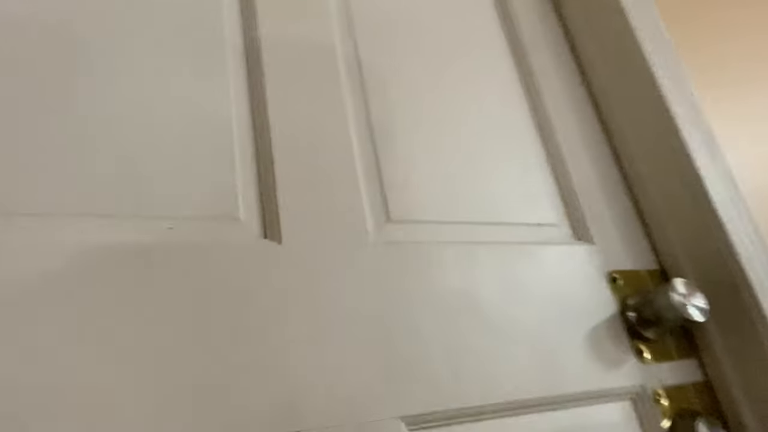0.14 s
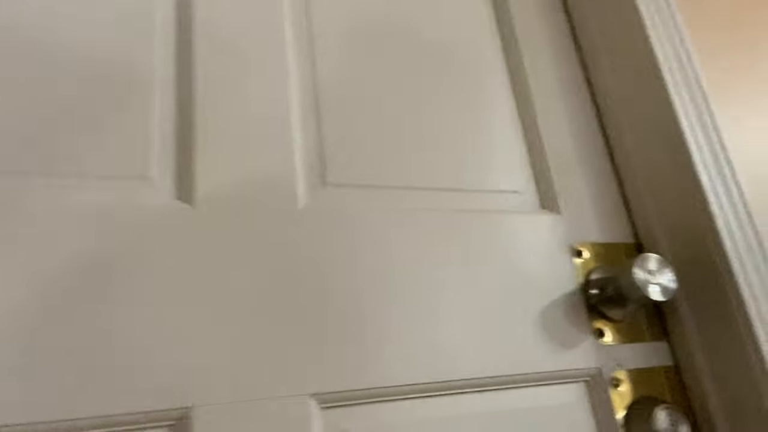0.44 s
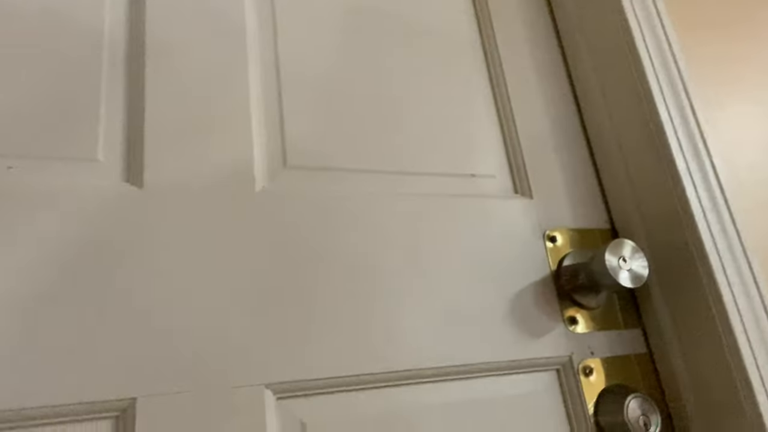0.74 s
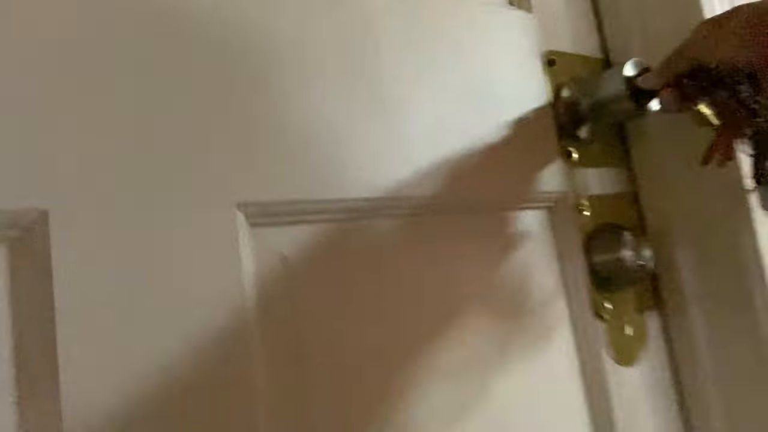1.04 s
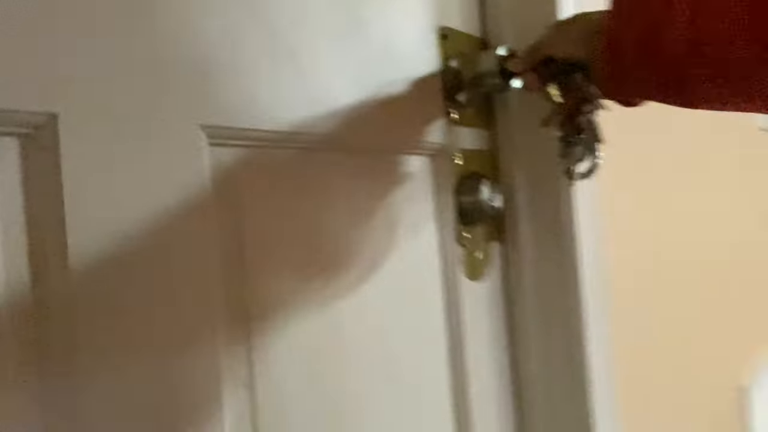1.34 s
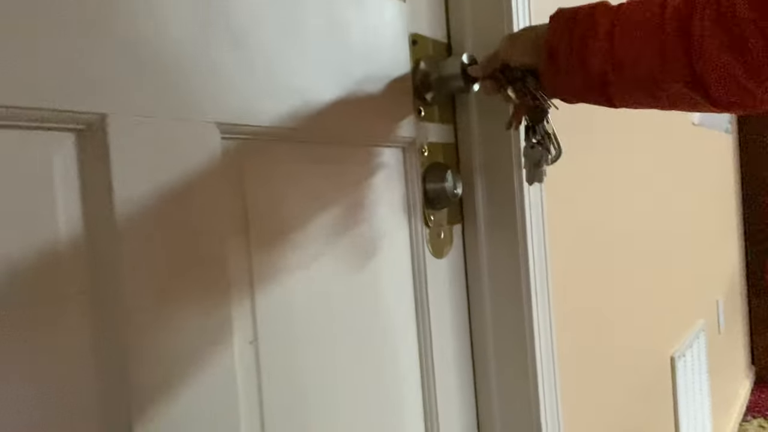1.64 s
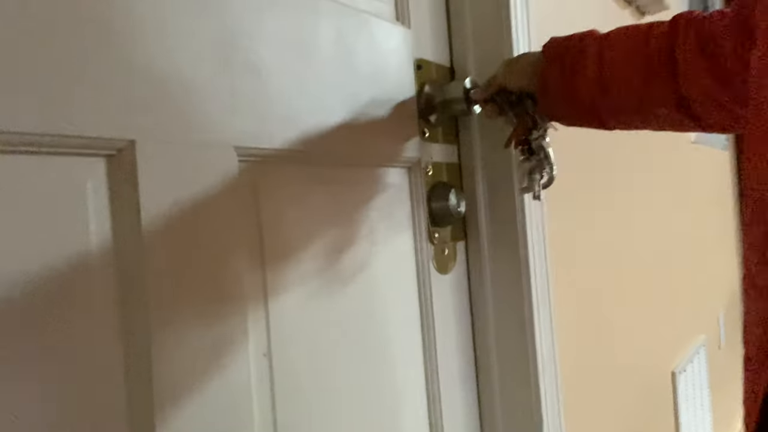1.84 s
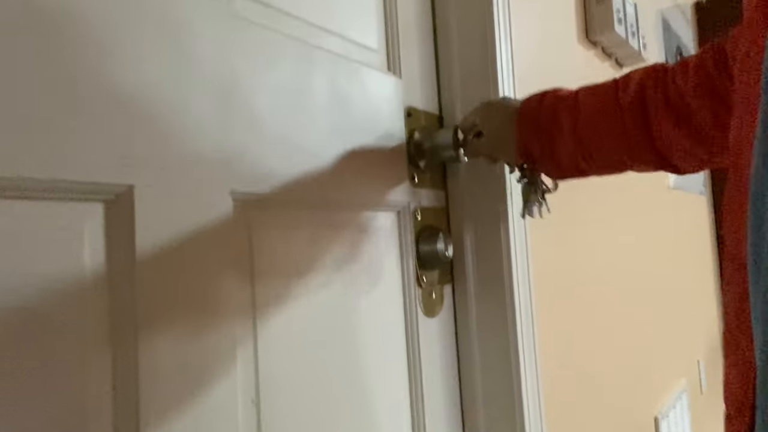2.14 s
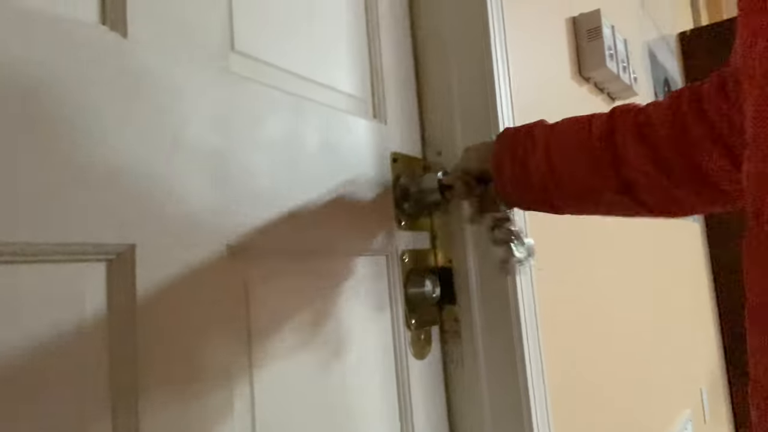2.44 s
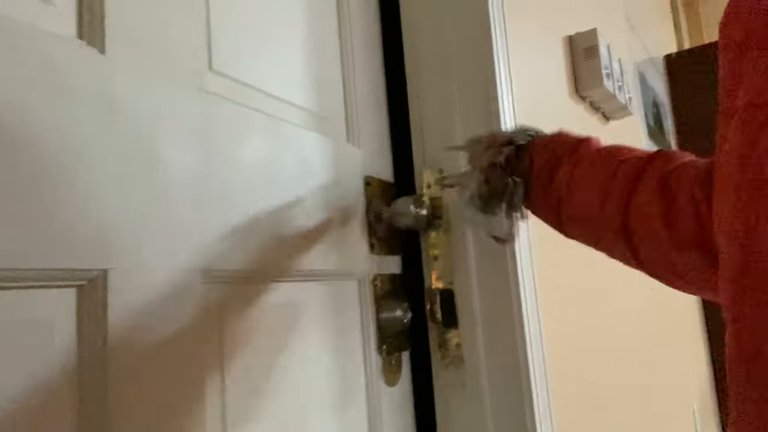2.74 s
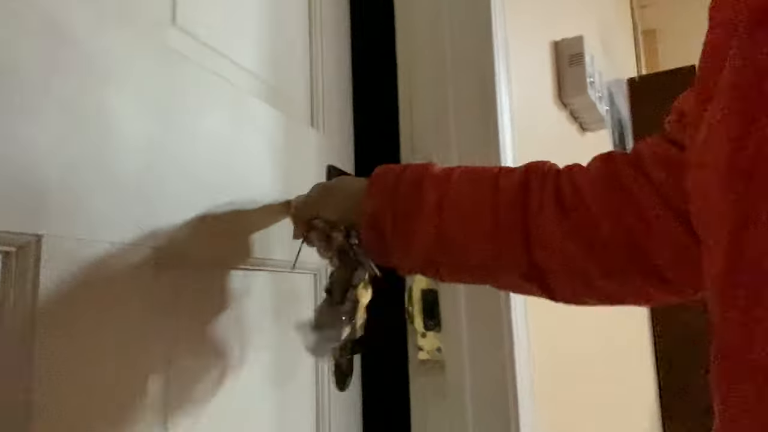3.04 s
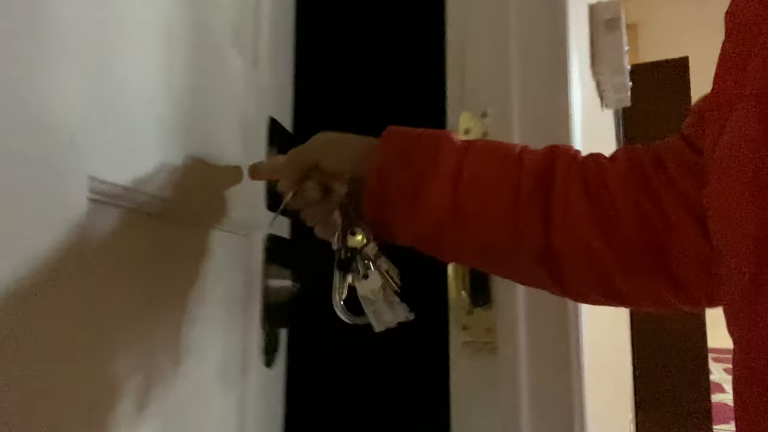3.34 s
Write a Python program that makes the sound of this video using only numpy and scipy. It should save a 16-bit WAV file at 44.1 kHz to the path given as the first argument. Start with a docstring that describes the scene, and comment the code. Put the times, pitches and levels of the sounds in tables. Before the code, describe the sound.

Keys jingle brightly as a door lock is keyed, turned with a loud clack, and released

```python
"""A bunch of keys swings and jangles, a little to the right, as random touches ring damped metal modes.
One key slides into a deadbolt and seats with a click: sliding slips and sharp contacts ring the lock body.
The cylinder turns, the bolt scrapes back and clacks, the wooden door thuds free in low modes,
and the keys clink on. Heard throughout from arm's length in a hallway with a low rumble, a faint hiss and
a sleeve's filtered-noise rustle, in stereo, with left and right differing in phase and level by frequency."""
import sys
import numpy as np
from scipy import signal
from scipy.fft import rfft, irfft, next_fast_len
from scipy.io import wavfile
from scipy.ndimage import uniform_filter1d, map_coordinates

SR = 44100
rng = np.random.default_rng(int(sys.argv[2]) if len(sys.argv) > 2 else 0)


def to_wav(s):
    """Save 16-bit WAV."""
    ch = np.atleast_2d(s).T  # columns
    pcm = np.round(np.clip(ch, -1, 1) * 32767)  # PCM
    wavfile.write(sys.argv[1], SR, pcm.astype(np.int16))


N = 154350

# All levels in the tables are relative; some sources have an extra trim.
# How hard the freely swinging bunch is shaken: time_s, level_db
SWING_SHAKE = [(0, -57.5), (0.16, -56), (0.225, -19), (0.268, -14.5), (0.295, -19.5), (0.335, -34),
               (0.44, -28.5), (0.51, -40.5), (0.63, -29.5), (0.70, -40.5), (0.74, -48), (0.84, -86.5)]
# How hard the bunch is shaken as it hangs from the lock: time_s, level_db
HANGING_SHAKE = [(0.84, -58), (0.875, -40), (1.02, -31.5), (1.2, -59.5), (1.39, -76), (1.44, -50),
                 (1.56, -117.5), (1.9, -74), (2.3, -65.5), (2.42, -61), (2.53, -54.5), (2.68, -41.5),
                 (2.82, -39), (2.88, -44.5), (2.97, -50), (3.04, -48), (3.13, -42), (3.18, -56),
                 (3.22, -35.5), (3.28, -70), (3.47, -72)]
# Single clinks of key on key: start_s, level_db
KEY_CLINKS = [(0.1765, -26.5), (0.2103, -8.5), (0.2362, -6.5), (0.367, -14), (0.464, -13.5), (0.473, -5.5),
              (0.528, -11), (0.6127, -23), (0.872, -16), (0.92, -13.5), (0.977, -12), (0.988, -10.5),
              (1.0539, -0.5), (1.425, -22), (1.4571, -27.5), (1.499, -31), (2.375, -19.5), (2.4034, -17),
              (2.6613, -13.5), (2.676, -11.5), (2.7745, -23), (2.861, -4), (2.8731, -11), (2.8929, -7.5),
              (2.9078, -9.5), (2.9671, -21.5), (3.0212, -8), (3.0379, -10), (3.048, -18), (3.074, -7.5),
              (3.1087, -18), (3.196, -3), (3.2073, -6), (3.25, -16.5), (3.301, -22.5), (3.3387, -17.5),
              (3.4258, -26)]
# Single notes that ring on, from free keys and from the key meeting the keyway:
# start_s, pitch_hz, level_db, t60_s
SINGLE_NOTES = [(0.0, 4040, -54.5, 0.32), (0.177, 10330, -27, 0.3), (0.208, 7610, -20.5, 0.072),
                (0.37, 8005, -25, 0.5), (0.465, 10690, -39.5, .45), (0.224, 2780, -39.5, 0.21),
                (0.977, 2460, -30.5, 0.16), (3.107, 7020, -29.5, 0.13)]
# Contacts inside the lock: start_s, body_level_db, steel_tick_level_db, favoured_pitch_hz
LOCK_CONTACTS = [(0.862, -26, -47, 410), (1.048, -16.5, -18.5, 536), (1.055, -16.5, -18.5, 980),
                 (1.94, -14.5, -36.5, 1960), (2.05, -29, -40.5, 1195), (2.127, -35.5, -61, 3150),
                 (2.354, -16.5, -34.5, 1210), (2.398, -28, -27.5, 3060), (2.422, -23, -35.5, 1600),
                 (2.437, -29, -31.5, 1000), (2.489, -16, -38, 1920), (2.587, -3.5, -29, 930),
                 (2.591, -10, -43, 790), (2.635, -9, -44, 417), (2.662, -9, -25.5, 1580),
                 (2.671, -14, -42, 408), (2.874, -40, -23.5, 3060), (3.006, -28.5, -34.5, 930),
                 (3.039, -42, -24.5, 3060)]
# Metal sliding on metal: start_s, end_s, level_db
METAL_SLIDES = [(0.883, 1.058, -54), (2.362, 2.495, -35), (2.403, 2.427, -33), (2.635, 2.655, -33)]
# Blows that shake the door: start_s, level_db
DOOR_BLOWS = [(0.872, -22.5), (0.989, -26.5), (1.947, -21.5), (2.42, -24), (2.598, -8.5), (2.64, -13.5),
              (2.669, -19), (3.006, -24.5)]
# Movement of the sleeve and hand: time_s, level_db
SLEEVE_MOVES = [(0, -58), (0.6, -68.5), (0.72, -46), (0.82, -52.5), (0.9, -54.5), (1.15, -46.5), (1.3, -46),
                (1.45, -48.5), (1.6, -55.5), (1.7, -55), (1.88, -64.5), (2.2, -55.5), (2.32, -50),
                (2.5, -40), (2.8, -59.5), (2.95, -60.5), (3.35, -56), (3.47, -53.5)]

# Long ringing notes of the keys: pitch_hz, level_db, t60_s
KEY_LONG_MODES = [(2600, -10, .2), (6121, -6, .2), (7030, -1, .16), (7500, 1, .18), (8040, 3, .2),
                  (10659, 1, .2), (11720, 0, .18), (12182, 0, .18), (12570, 2, .2)]
# Lock body in its door: pitch_hz, level_db, t60_s
LOCK_BODY_MODES = [(386.4, -3, 0.093), (538, -7, 0.094), (655, -6, 0.065), (788, -0.5, 0.053),
                   (913, 0.5, 0.034), (1020, -16, 0.054), (1177, -6.5, 0.04), (1523, -14, 0.064),
                   (1877, -3, 0.018), (2080, 1, 0.0096), (2900, 4.5, 0.014)]
# Wooden door leaf: pitch_hz, level_db, t60_s
DOOR_LEAF_MODES = [(57, -8, 0.4), (72.5, -4.5, 0.16), (93.3, -2.5, 0.14), (126.6, -10.5, 0.52),
                   (155.3, 0, 0.29), (205.1, -4.5, 0.21), (259.4, -4.5, 0.14), (304, -13, 0.16),
                   (396, 6.5, 0.059)]

# Spectrum of key contacts: frequency_hz, level_db
KEY_SPECTRUM = [(300, -69.5), (1200, -18), (2400, -7), (4000, -11), (6000, -4.5), (7700, 4), (9300, 4.5),
                (11000, 2.5), (12700, -4.5), (13900, -4), (15700, -0.5)]
# Spectrum of lock contacts: frequency_hz, level_db
LOCK_SPECTRUM = [(100, 5), (400, -9.5), (900, 0), (1450, -5.5), (2100, -1.5), (3200, -12), (4500, -17),
                 (15000, -66.5)]
# Spectrum of the steel tick: frequency_hz, level_db
TICK_SPECTRUM = [(1000, -8.5), (3500, 2.5), (7000, 8), (12500, 3.5), (13800, -4), (16000, -20)]
# Spectrum of the sleeve: frequency_hz, level_db
SLEEVE_SPECTRUM = [(100, 4), (220, 1), (450, 1.5), (800, -6), (1500, -11), (3000, -19), (15000, -37.5)]
# Spectrum of the low rumble: frequency_hz, level_db
RUMBLE_SPECTRUM = [(20, -35.5), (36, -14.5), (52, 2.5), (85, 1), (105, 3.5), (155, -6), (220, -8.5),
                   (320, -34), (700, -61.5)]
# Spectrum of the faint hiss: frequency_hz, level_db
HISS_SPECTRUM = [(200, -5.5), (6000, 6), (12000, -48.5)]

# Decay of the hallway's tail: frequency_hz, t60_s
HALL_DECAY = [(100, 0.29), (2000, 0.84), (7000, 0.19), (15000, 0.093)]
# Phase by which left leads right: frequency_hz, lead_radians
STEREO_PHASE = [(100, 0), (800, 1.3), (2500, 1.8), (4500, 1.3), (5700, 0), (7200, -.5), (8800, -2.9),
                (9700, -3.2), (11600, -6.1), (12900, -6.4), (14200, -9.3)]
# Level by which left exceeds right: frequency_hz, difference_db
STEREO_BALANCE = [(200, 0), (380, -2), (700, 3), (1600, 2.5), (4400, -1), (12000, .5)]
# Likeness of diffuse sound in left and right: frequency_hz, correlation (1 = identical)
STEREO_LIKENESS = [(150, .88), (500, .5), (4500, .15), (7000, .55), (9300, .97), (12000, .95), (16000, .8)]

SWING_DB, HANGING_DB, CLINK_DB, BODY_DB, TICK_DB = -2.5, 3, -6.5, -4.5, 12  # trims
RUMBLE_DB, HISS_DB, RUSTLE_DB = -41, -88, 4
TOUCHES_PER_S = 380  # mean over the whole bunch
GRAZE_S, GRAZE_DB = 0.03, -17  # time to swell by 60 dB, relative level at the strike
SPOT_DB, SPOT_OCTAVES = 8, .17  # boost of the lock modes near the favoured pitch, and its width
TOP_HZ = 15950  # upper band limit


def jangle(shake, long_db, crack_db, count=24):
    """Each key is touched at random, as hard as the bunch is shaken, with fresh mode levels per touch."""
    t = np.arange(SR // 5) / SR
    out = np.zeros((2, N))
    gain = level(shake)
    for _ in range(count):
        hits = touches(TOUCHES_PER_S / count, spread_db=6) * gain
        when = np.flatnonzero(hits)
        contact = amp(crack_db) * crack(KEY_SPECTRUM, t, t60=.014)
        notes = key_notes(t, short_t60=.05, long_db=long_db, count=len(when))
        for k, note in zip(when, notes):
            add(out, k / SR, hits[k] * unit(note + contact))
    return out / np.sqrt(count * len(t))


def clinks(chatter_s=0.0097, count=2):
    """The stronger collisions of keys, each followed by a quick chatter of weaker ones."""
    t = np.arange(SR // 4) / SR
    out = np.zeros((2, N))
    for s, db in KEY_CLINKS:
        delays = np.append(0, chatter_s * rng.uniform(.15, 1, count))
        for k, delay in enumerate(delays):
            contact = crack(KEY_SPECTRUM, t, t60=.008)
            notes = key_notes(t, short_t60=.028, long_db=-15, count=1)
            add(out, s + delay, amp(db + CLINK_DB - 10 * (k > 0)) * (contact + amp(-4) * notes))
    return out


def single_notes():
    """Free keys, and the key meeting the keyway, ring on, each as one exponentially decaying sine."""
    t = np.arange(SR // 2) / SR
    out = np.zeros((2, N))
    for s, hz, db, t60 in SINGLE_NOTES:
        add(out, s, amp(db - 60 * t / t60) * np.sin(2 * np.pi * hz * t))
    return out


def key_notes(t, short_t60, long_db, count):
    """Several strikes of one key excite its own quickly damped modes and the bunch's long notes."""
    edges = np.geomspace(3000, 14200, 15)
    hz = rng.uniform(edges[:-1], edges[1:])  # one mode in each band
    mode_db = along(KEY_SPECTRUM, hz) + 10 * np.log10(hz)
    own = np.column_stack([hz, mode_db, short_t60 * rng.uniform(0.19, 1.76, len(hz))])
    short_notes = ring(own, t, scatter_db=4, count=count)
    long_notes = ring(KEY_LONG_MODES, t, scatter_db=4, detune=.012, count=count)
    return (short_notes + amp(long_db) * long_notes) * (1 - np.exp(-t / .0003))


def lock():
    """Key, pins and bolt graze, tick and crack; the lock body rings most near the struck spot's pitch."""
    t = np.arange(SR // 5) / SR
    out = np.zeros((2, N))
    hz, mode_db, t60 = np.transpose(LOCK_BODY_MODES)
    for s, db, tick_db, spot_hz in LOCK_CONTACTS:
        body_gain, tick_gain = amp(db + BODY_DB), amp(tick_db + TICK_DB)
        favour_db = SPOT_DB * np.exp(-(np.log2(hz / spot_hz) / SPOT_OCTAVES) ** 2)
        modes = np.column_stack([hz, mode_db + favour_db, t60])
        body_crack = amp(-2) * crack(LOCK_SPECTRUM, t, t60=.035)
        body = body_crack + amp(3) * ring(modes, t, scatter_db=2.5, detune=.015)
        tick = crack(TICK_SPECTRUM, t, t60=0.011)
        onset = 1 - np.exp(-t / 0.0004)
        add(out, s, (body_gain * body + tick_gain * tick) * onset)
        lead = amp(4) * body_gain * graze(LOCK_SPECTRUM) + tick_gain * graze(TICK_SPECTRUM)
        add(out, s - lead.shape[1] / SR, lead)  # ends at the strike
    return out


def graze(colour, size=1024):
    """Parts graze before they strike: a noise scratch that swells exponentially into the contact."""
    before_s = np.arange(size)[::-1] / SR
    return unit(coloured(noise(size), colour)) * amp(GRAZE_DB - 60 * before_s / GRAZE_S)


def slides(edge_s=0.004, bright_db=-11, ring_db=-3, count=6):
    """Key in keyway and bolt on strike plate slip at several spots, each ringing the lock its own way."""
    t = np.arange(N) / SR
    out = np.zeros((2, N))
    force = np.zeros(N)
    for start, end, db in METAL_SLIDES:
        force += amp(db) * np.clip(np.minimum(t - start, end - t) / edge_s + .5, 0, 1)
    short = t[:SR // 8]
    for _ in range(count):
        slips = force * touches(per_s=130, spread_db=8)
        dull = unit(crack(LOCK_SPECTRUM, short, t60=0.01))
        bright = unit(crack(TICK_SPECTRUM, short, t60=0.008))
        body = unit(ring(LOCK_BODY_MODES, short, scatter_db=5, detune=.04))
        answer = dull + amp(bright_db) * bright + amp(ring_db) * body
        out += signal.fftconvolve(slips[None], answer, axes=1)[:, :N]
    return out / np.sqrt(count * len(short))


def door():
    """The wooden leaf booms in its damped low modes when the key or bolt jolts it."""
    t = np.arange(SR // 2) / SR
    out = np.zeros((2, N))
    for s, db in DOOR_BLOWS:
        boom = ring(DOOR_LEAF_MODES, t, scatter_db=3, detune=.025)
        add(out, s, amp(db) * boom * (1 - np.exp(-t / .003)))
    return out


def sleeve_cloth():
    """The sleeve's coloured noise, made uneven by random patches in time and frequency, at rms 1."""
    z = signal.stft(bed(SLEEVE_SPECTRUM), nperseg=1024)[2]
    patches = uniform_filter1d(rng.standard_normal(z.shape[1:]), size=6, axis=0)
    patches = unit(uniform_filter1d(patches, size=5, axis=1))
    return unit(signal.istft(z * amp(4 * patches), nperseg=1024)[1][:, :N])


def background(flutter_db=3.5):
    """Steady low rumble and faint hiss, both filtered noise, and the sleeve's fluttering rustle."""
    cloth = sleeve_cloth()
    hiss = amp(HISS_DB) * bed(HISS_SPECTRUM)
    rumble = amp(RUMBLE_DB) * bed(RUMBLE_SPECTRUM)
    rustle = amp(RUSTLE_DB + flutter_db * wobble(rate=6.09)) * level(SLEEVE_MOVES) * cloth
    return rumble + hiss + rustle


def in_hall(x, wet_db, walls_db):
    """Direct sound, quick reflections from door and frame, and the hallway's decaying noise tail."""
    hz, t, z = signal.stft(noise(size=SR // 2), SR, nperseg=256)
    decay = amp(-60 * t / along(HALL_DECAY, hz)[:, None])
    tail = signal.istft(z * decay, SR, nperseg=256)[1]
    t = np.arange(tail.shape[1]) / SR
    tail = tail * (1 - np.exp(-t / 0.0031))
    # sparse echoes that start after 1 ms
    echoes = rng.standard_normal(tail.shape) * (rng.random(tail.shape) < .02) * (t > .001)
    walls = paired(echoes * amp(-60 * t / 0.034))
    answer = amp(wet_db) * tail / np.linalg.norm(tail[0])
    answer = answer + amp(walls_db) * walls / np.linalg.norm(walls[0])
    return x + signal.fftconvolve(x.mean(0)[None], answer, axes=1)[:, :N]


def ring(modes, t, scatter_db, detune=0, count=1):
    """Damped modes, detuned once per call, with levels and signs varied per strike (one row each)."""
    hz, db, t60 = np.transpose(modes)[:, :, None]
    hz = hz * (1 + detune * rng.standard_normal(hz.shape))
    shape = (count, len(modes))
    gain = amp(db.T + scatter_db * rng.standard_normal(shape)) * rng.choice([-1, 1], shape)
    gain = gain / np.linalg.norm(gain, axis=1, keepdims=True)
    return gain @ (amp(-60 * t / t60) * np.sin(2 * np.pi * hz * t))


def crack(colour, t, t60):
    """The short burst of a hard contact: fading coloured noise that starts near rms 1."""
    fade = amp(-60 * t / t60)
    return unit(coloured(noise(len(t)) * fade, colour)) * np.sqrt(np.mean(fade ** 2))


def touches(per_s, spread_db):
    """Random tiny impacts of uneven size and either sign."""
    struck = rng.random(N) < per_s / SR
    return unit(struck * rng.choice([-1, 1], N) * amp(spread_db * rng.uniform(-1, 1, N)))


def noise(size):
    """Diffuse stereo noise."""
    return paired(rng.standard_normal((2, size)))


def bed(colour):
    """Steady stereo noise with the given spectrum, at rms 1."""
    return unit(filtered(noise(size=N), lambda hz: amp(along(colour, hz))))


def paired(two):
    """Two unrelated signals mixed as sum and difference, so left and right are alike by frequency."""
    def mix(hz):
        turn = np.arccos(np.clip(along(STEREO_LIKENESS, hz), -1, 1)) / 2
        return np.array([np.cos(turn), np.sin(turn)])
    mid, side = filtered(two, mix)
    return np.array([mid + side, mid - side])


def wobble(rate):
    """A smooth random curve, rate knots a second."""
    knots = rng.standard_normal(int(N * rate / SR) + 4)
    return map_coordinates(knots, [np.arange(N) * rate / SR])


def coloured(x, points, size=2048):
    """Causal minimum-phase filter with the given spectrum, made by folding its cepstrum."""
    cepstrum = irfft(np.log(amp(along(points, np.fft.rfftfreq(size, 1 / SR)))))
    cepstrum[1:size // 2] *= 2
    cepstrum[size // 2 + 1:] = 0
    impulse = irfft(np.exp(rfft(cepstrum)))
    return signal.fftconvolve(x, impulse[None], axes=1)[:, :x.shape[1]]


def filtered(x, response):
    """x filtered by a response given as a function of frequency."""
    n = x.shape[-1]
    m = next_fast_len(n + 4096)  # zero padding against wrap-around
    return irfft(rfft(x, m) * response(np.fft.rfftfreq(m, 1 / SR)), m)[..., :n]


def add(track, s, sound):
    """Mix a sound into a track at time s."""
    part = track[..., max(0, round(s * SR)):][..., :sound.shape[-1]]
    part += sound[..., :part.shape[-1]]


def level(rows):
    """(time_s, level_db) rows as a gain per sample."""
    return amp(np.interp(np.arange(N) / SR, *np.transpose(rows)))


def along(points, hz):
    """(frequency_hz, value) points read along a log axis."""
    f, v = np.transpose(points)
    return np.interp(np.log(hz + 1), np.log(f + 1), v)


def unit(x):
    """x scaled to rms 1."""
    return x / np.sqrt(np.mean(x ** 2) + 1e-20)


def amp(db):
    """Decibels as an amplitude factor."""
    return 10 ** (np.asarray(db) / 20)


def scene():
    """The keys swing slightly to the right, then everything happens at the lock."""
    to_right_db = np.array([[-1], [1]])
    swing = amp(SWING_DB + to_right_db) * jangle(SWING_SHAKE, long_db=-10, crack_db=-7)
    hanging = amp(HANGING_DB) * jangle(HANGING_SHAKE, long_db=-16, crack_db=-2)
    keys = in_hall(swing + hanging + clinks() + single_notes(), wet_db=-12.5, walls_db=-3)
    metal = in_hall(lock() + slides(), wet_db=-19.5, walls_db=-1.5)
    wood = in_hall(door(), wet_db=-13, walls_db=-6.5)
    return keys + metal + wood + background()


def record(dry):
    """Left and right differ in phase and level by frequency; nothing passes above the band limit."""
    apart = np.array([[.5], [-.5]])  # half of each difference goes to each side

    def sides(hz):
        gain = amp(apart * along(STEREO_BALANCE, hz))
        return gain * np.exp(1j * apart * along(STEREO_PHASE, hz)) * (hz < TOP_HZ)
    return filtered(dry, sides)


dry = scene()
out = record(dry)
to_wav(out)
```